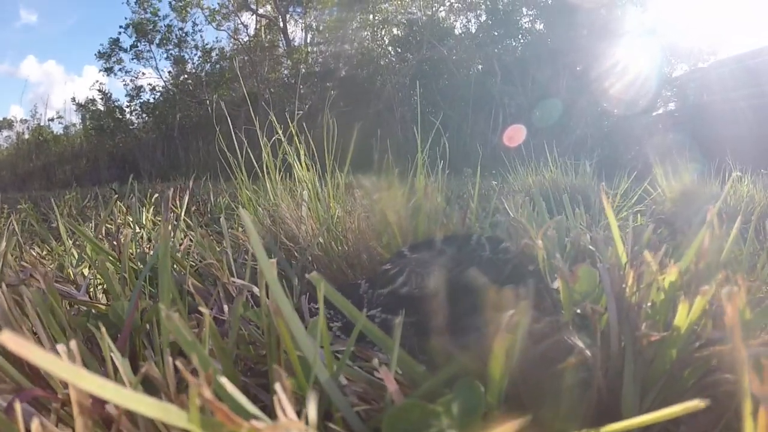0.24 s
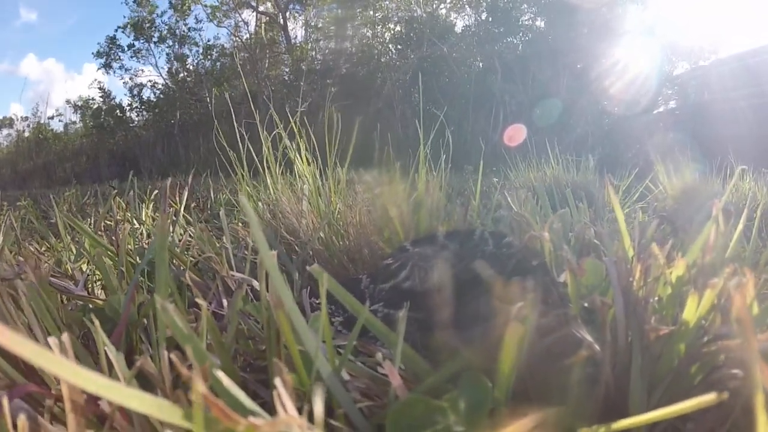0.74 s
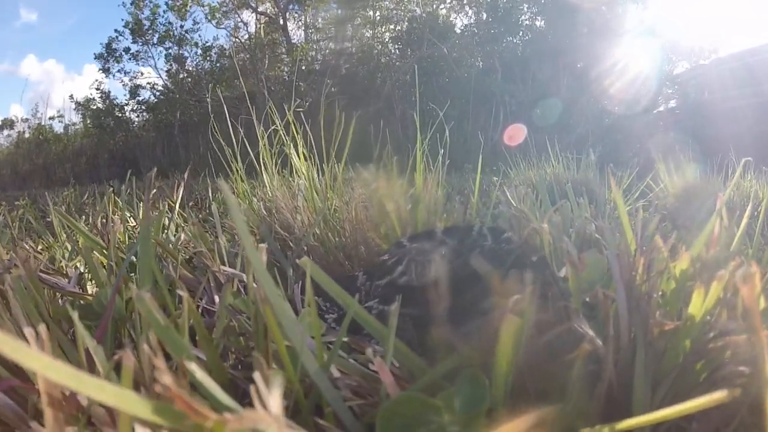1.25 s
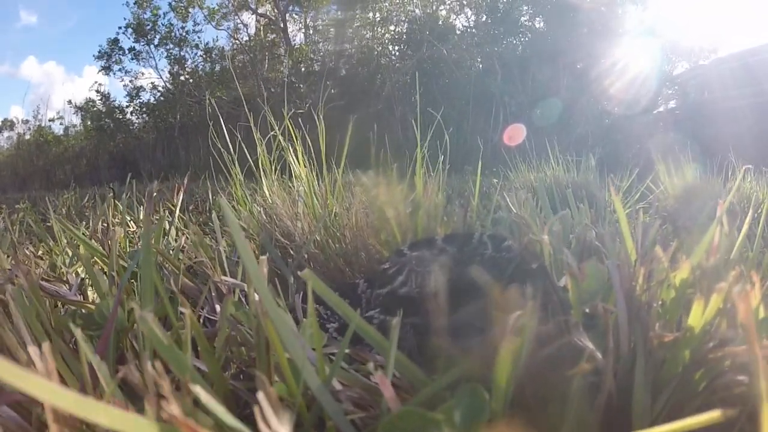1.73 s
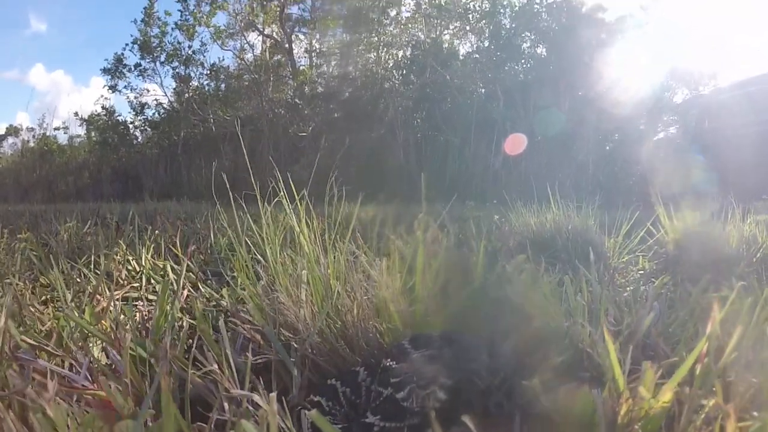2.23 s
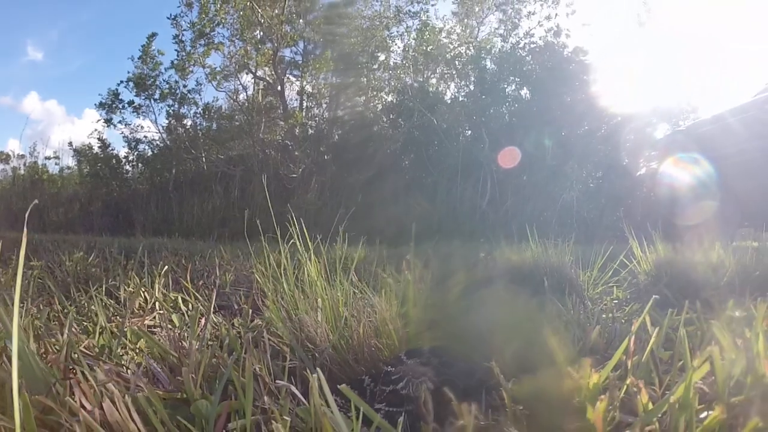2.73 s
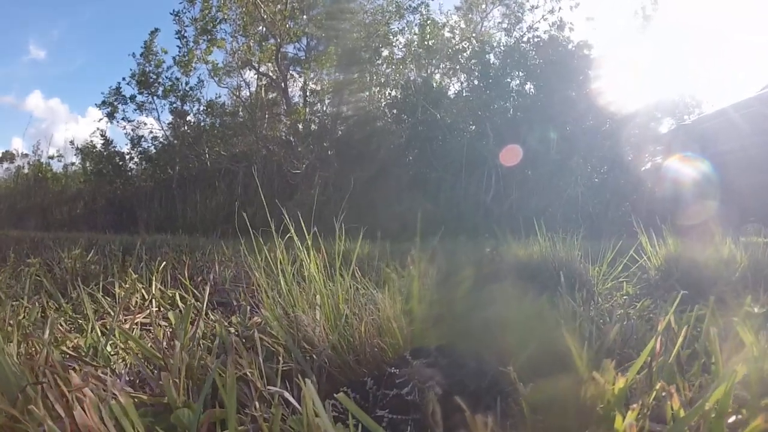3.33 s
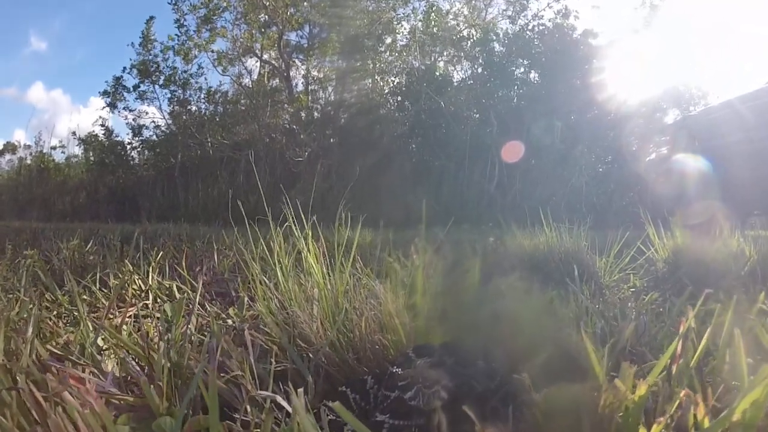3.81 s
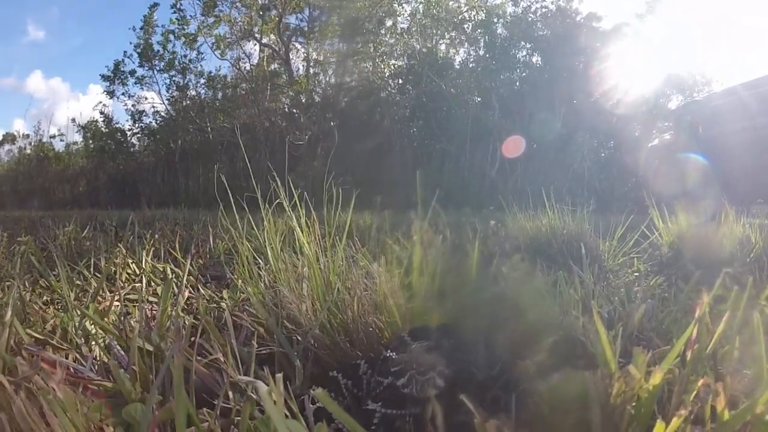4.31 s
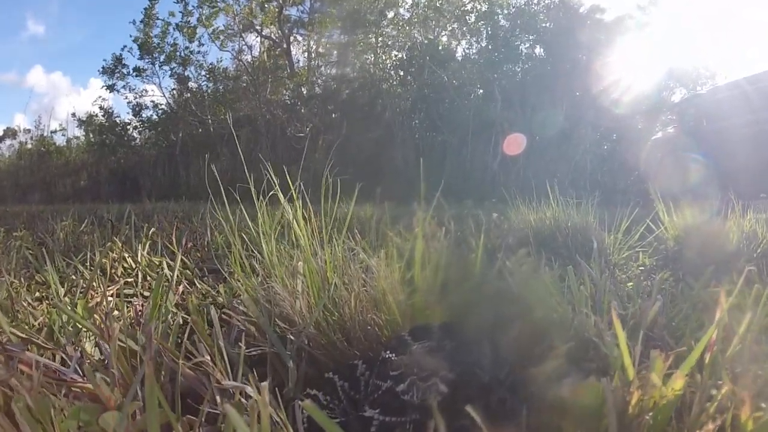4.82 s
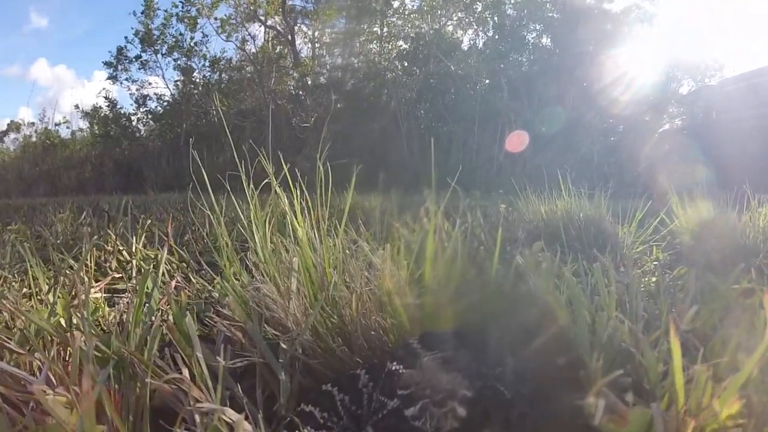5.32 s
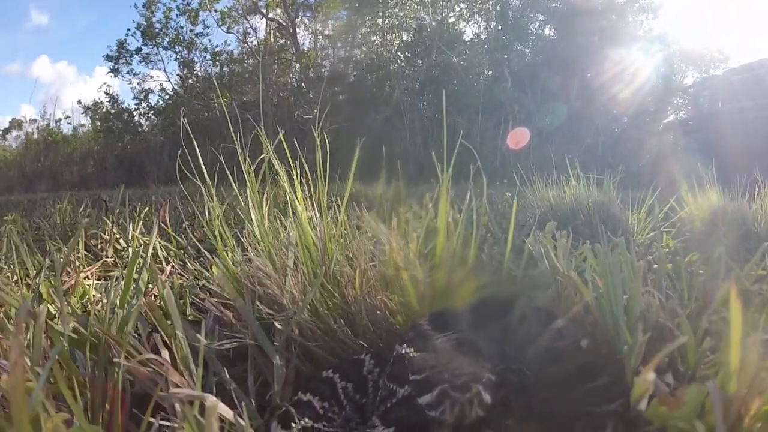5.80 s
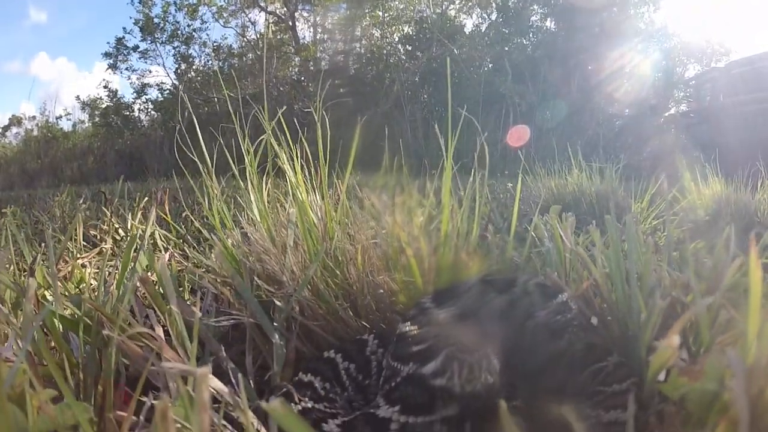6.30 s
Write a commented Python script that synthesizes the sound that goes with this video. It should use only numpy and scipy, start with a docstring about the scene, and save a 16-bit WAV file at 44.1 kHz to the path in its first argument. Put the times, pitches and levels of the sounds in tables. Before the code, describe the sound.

A rattlesnake buzzes without pause right beside a microphone inside a plastic housing in the grass. A bump and rubbing open it, blades scrape and flick against the shell, and a sharp cluster of flicks comes around two seconds. The middle is quieter, mostly rattle and low wind. Near six seconds a hard knock cracks and booms as the rattle surges, then rubbing and a smaller knock follow.

```python
"""A rattlesnake buzzes in the grass beside a plastic housing that holds the microphone.
From the start segments clash and ring at each tail stroke, grass rubs and ticks on the housing,
wind rumbles, and the housing booms softly as the grass presses. Knocks and bounces begin at once,
sliding swishes and flicks of bent blades from 0.2 s; the hardest knock falls near 5.9 s."""
import sys
import numpy as np
from scipy import signal
from scipy.fft import rfft, irfft
from scipy.io import wavfile
from scipy.ndimage import uniform_filter1d, map_coordinates

SR = 44100
rng = np.random.default_rng(int(sys.argv[2]) if len(sys.argv) > 2 else 0)


def file_out(sig):
    """Save sig as 16-bit WAV at sys.argv[1]."""
    # one column per channel
    cols = np.atleast_2d(sig).T
    # limit, then scale
    lim = np.clip(cols, -1, 1)
    pcm = np.round(lim * 32767).astype(np.int16)
    wavfile.write(sys.argv[1], SR, pcm)


N = 288855
TIME_S = np.arange(N) / SR

# tail shaking: (time [s], rate [strokes/s])
SHAKE = [(0, 170), (1.0, 164), (1.9, 143), (2.35, 172), (3.2, 155), (4.8, 138), (5.45, 166), (5.8, 160),
         (6.05, 220), (6.55, 173)]
# rattle loudness before a common gain: (time [s], relative level [dB])
RATTLE_LEVEL = [(0, -55), (.5, -52.5), (1.7, -55.5), (2.3, -54.5), (2.95, -59.5), (4.95, -56.5),
                (5.85, -51), (6.02, -48.5), (6.55, -52)]
# hollow keratin segments: (centre [Hz], width [Hz], relative density coiled, drawn back, raised [dB])
SEGMENT_MODES = [(3000, 1350, -8.5, -8.5, -25), (3607, 211, 15, 5, 8), (4280, 750, 0.5, -6.5, 2),
                 (5977, 153, 9, 3, 9.5), (6300, 710, -4, -9, -4), (7740, 210, 3, -7.5, -6),
                 (8870, 1500, -9, -10.5, -7), (9370, 190, 10, 0.5, 6), (9714, 400, -9, -2.5, 0.5),
                 (12140, 550, -25, -17, -7), (13140, 930, -6.5, -20, -19), (13800, 590, -15, -15, -2)]
# rattle posture: (time [s], posture [0 coiled close, 1 drawn back, 2 raised])
POSTURE = [(0, 0.16), (1.75, 0), (2.3, 0.79), (4.9, 0.75), (5.5, 1.7), (5.95, 0.62), (6.25, 1.95)]
TIGHT_PER_S, LOOSE_PER_S = 173.4, 167.4  # strokes/s: segments in step, thrown about

# steady lean of the grass on the housing: (time [s], pressure level [dB])
LEAN = [(0, -54.5), (1.5, -52), (2.15, -43), (2.65, -44.5), (2.92, -58), (3.65, -54.5), (4.0, -45),
        (4.7, -50), (5.15, -43), (5.45, -49.5), (6.55, -46.5)]
# movements pushing grass along the housing: (start [s], length [s], pressure level halfway [dB])
PUSHES = [(0, 0.082, -39), (0.093, 0.23, -41.5), (0.481, 0.14, -45.5), (.643, 0.016, -33.5),
          (0.728, .16, -39.5), (1.014, .1, -46.5), (1.126, .18, -41), (1.523, 0.039, -51.5),
          (1.732, 0.085, -41), (1.819, 0.22, -35), (2.59, 0.046, -36), (3.95, 0.039, -44),
          (4.02, 0.046, -47.5), (4.178, 0.11, -44.5), (4.383, 0.043, -41.5), (5.63, 0.15, -40.5),
          (5.763, 0.16, -35), (5.867, 0.15, -30), (6.094, 0.11, -38), (6.276, .045, -43.5),
          (6.408, 0.17, -43)]
PUSH_ATTACK_S, PUSH_RELEASE_S, PUSH_SWELL_DB = .0064, .015, 2.5
REFERENCE_DB = -39  # pressure of a moderate push
# treble of the rubbing: (time [s], gain above the edge frequency [dB])
RUB_EDGE = [(0, 2.5), (.8, -6), (1.4, 5), (1.8, -7), (2.03, 5.5), (2.2, -2), (2.7, -7.5), (3.5, 0.5),
            (4.0, 1), (4.8, -2.5), (5.7, 0.5), (6.1, -1.5), (6.55, 8)]
# resonances of the plastic housing: (centre [Hz], width [Hz], gain [dB])
HOUSING_MODES = [(275, 90, -8), (453, 22, -3), (716, 110, -2.5), (930, 182, 3), (1196, 260, -1),
                 (1397, 72, 7), (1744, 100, -0.5), (2236, 127, 1.5), (2629, 99, 5.5), (2700, 420, 0.5),
                 (3510, 45, -31), (4120, 220, -3.5), (5630, 150, -6), (6530, 124, -5), (10020, 360, -8.5)]

# wind rumble: (time [s], level [dB])
WIND_LEVEL = [(0, -33), (.3, -40.5), (1.7, -39.5), (2.38, -36.5), (2.75, -37.5), (3.3, -41.5), (4.15, -39),
              (5.25, -40), (5.85, -39), (6.2, -41), (6.36, -37)]
# rumble spectrum: (frequency [Hz], relative density [dB])
WIND_COLOUR = [(10, -33.5), (22, 2), (45, -5.5), (70, -17), (110, -25), (250, -28), (500, -31.5),
               (2000, -42), (15000, -76)]
# open-air hush ahead of its low-pass: (frequency [Hz], relative density [dB])
AIR_COLOUR = [(100, -38), (250, -9), (470, -5.5), (900, -15.5), (2000, -11), (5000, -2.5), (15000, 8)]
BOOM_DB, BOOM_COILED_DB = -40.5, 3  # at REFERENCE_DB; extra when fully coiled
BOOM_FOLLOWS = .44  # dB of boom per dB of pressure

TICKS_PER_S, TICK_RATE_FOLLOWS = 14, .7  # rate at REFERENCE_DB; dB of rate per dB of pressure
TICK_DB, TICK_SPREAD_DB, TICK_HZ = -1.5, .5, 2500  # level relative to pressure; centre pitch
FLICK_DECAY_S = .0018  # ticks and flicks
CRACK_DB = -15.5  # relative to the blade
CRACK_FROM_DB, CRACK_GROWS = -24, 1.93  # harder flicks gain this many extra dB per dB

# housing rocked on its mount: (time [s], swing level [dB], T60 [s])
BOUNCES = [(0.017, -24.5, 0.54), (.925, -29.5, .3), (1.417, -24, 0.2), (2.595, -23, 0.3),
           (2.808, -29, 0.33), (3.505, -30, 0.16), (5.024, -25.5, 0.15), (5.9066, -11.5, 0.14),
           (6.362, -31, 0.34), (6.51, -27.5, .25)]
BOUNCE_HZ, SHOVE_DB = 121.3, -.5  # shove relative to the swing, hardest jolt
# snake strikes: (time [s], housing [dB], contact decay [s], ring [Hz], ring [dB], crack [dB],
#                 thump [dB], thump [Hz])
KNOCKS = [(0.0175, -27, .0007, 2440, -32.5, -59, -43, 400),
          (1.410, -37.5, 0.0034, 2520, -48, -60, -41, 420),
          (2.5897, -29.5, 0.0092, 2920, -19.5, -56, -24.5, 490),
          (5.0441, -30, 0.0011, 2540, -50, -41, -35, 750),
          (5.9015, -14.5, 0.007, 5800, -20, -18.5, -19, 686),
          (6.3636, -18, 0.0018, 1340, -25.5, -41, -49, 600)]
THUMP_AFTER_S, THUMP_DECAY_S, THUMP_WIDTH_HZ = .0063, .00086, 500
# blades sliding off the housing: (start [s], length [s], level [dB], first [Hz], last [Hz])
SWISHES = [(0.195, 0.03, -44, 6500, 4480), (0.643, 0.034, -39.5, 6200, 5700),
           (0.658, 0.015, -30, 3250, 1914), (1.501, 0.031, -33, 6800, 5790),
           (1.505, 0.024, -32.5, 3100, 2330), (1.518, 0.04, -37, 2490, 1466),
           (1.933, 0.12, -39, 2900, 2090), (2.043, 0.021, -39, 5600, 2510), (3.70, 0.44, -49, 2390, 2390),
           (5.751, 0.032, -33.5, 2937, 2380), (5.883, 0.037, -26.5, 6670, 5450)]
# blades flicking the housing: (time [s], blade level [dB], blade pitch [Hz], housing re blade [dB])
FLICKS = [(0.209, -27.5, 2570, -7), (0.2726, -43, 2400, 9.5), (.4863, -45.5, 2740, 9),
          (0.5723, -39, 2530, -8), (0.908, -37.5, 1630, 0), (0.9313, -19, 6240, -8.5),
          (1.1427, -38, 1020, -10), (1.2818, -36, 2820, -1), (1.318, -35.5, 2530, 1),
          (1.8216, -30, 955, -1.5), (1.8288, -30, 2230, -17), (1.895, -29.5, 910, -17),
          (1.9285, -25, 960, -4), (1.9582, -15.5, 2870, -8), (1.976, -21.5, 2210, -15),
          (2.0222, -42, 2880, 0), (2.0694, -33.5, 1290, 4), (2.5886, -26, 4000, -4),
          (2.6754, -39.5, 4400, 0), (2.683, -41, 2720, 2), (3.2692, -42, 2800, -1), (3.969, -44.5, 2420, 7),
          (5.3568, -46, 2560, 9.5), (5.5451, -46.5, 2720, 6), (5.5906, -44.5, 6400, 3.5),
          (5.6378, -40.5, 2400, 4), (5.789, -30.5, 2730, -9), (5.8755, -27, 1540, -1.5),
          (5.999, -30.5, 2580, 4.5), (6.1269, -27, 2540, -4.5), (6.171, -31, 2570, -4),
          (6.4055, -31, 1380, -2), (6.4679, -32.5, 2570, -22), (6.505, -35, 2600, 1.5)]


def from_db(db):
    """Decibels to gain."""
    return 10 ** (np.asarray(db) / 20)


def rms_one(x):
    """Scale to unit rms."""
    return x / np.sqrt(np.mean(x ** 2) + 1e-20)


def curve(rows):
    """Second column of a (time, value) table, interpolated to every sample."""
    time_s, value = np.transpose(rows)
    return np.interp(TIME_S, time_s, value)


def add(track, start_s, sound):
    """Mix a short sound in at a given time."""
    at = max(0, round(start_s * SR))
    track[at:at + len(sound)] += sound[:N - at]


def cut(x, hz, kind, order=2):
    """Butterworth low- or high-pass."""
    return signal.sosfilt(signal.butter(order, hz, kind, fs=SR, output="sos"), x)


def band(x, hz, width_hz):
    """Pair of coupled resonances: flat top, steep sides."""
    edges_hz = [hz - width_hz / 2, hz + width_hz / 2]
    return signal.sosfilt(signal.butter(2, edges_hz, "band", fs=SR, output="sos"), x)


def resonate(x, hz, width_hz):
    """One resonance with gain 1 at its top."""
    r = np.exp(-np.pi * width_hz / SR)
    zeros = np.array([1, 0, -1]) * (1 - r * r) / 2
    poles = [1, -2 * r * np.cos(2 * np.pi * hz / SR), r * r]
    return signal.lfilter(zeros, poles, x + 1e-18)


def drift(rate_hz):
    """Slow random wander, rms 1; the filter's first second is dropped."""
    return rms_one(cut(rng.standard_normal(N + SR), rate_hz, "low")[SR:])


def coloured(spectrum):
    """Noise with a given spectrum, rms 1."""
    hz, db = np.transpose(spectrum)
    bins_hz = np.maximum(np.fft.rfftfreq(N, 1 / SR), 1)
    gain = from_db(np.interp(np.log(bins_hz), np.log(hz), db))
    return rms_one(irfft(rfft(rng.standard_normal(N)) * gain, N))


def evened(x, span_s):
    """Hold the running rms at 1, leaving faster detail alone."""
    power = uniform_filter1d(x * x, max(2, int(span_s * SR)))
    return x / np.sqrt(np.maximum(power, 1e-20))


def strokes(limp_db=3.5, rebound_db=-8, rebound_s=.0042):
    """Segments clash at each tail turn; loose shaking rebounds harder, in a four-stroke limp."""
    jitter_s, limp_s, scatter_db = .0005, .0006, 2.8  # scaled by the slack
    clatter_s, chatter, tightest = .00056, .05, .22
    per_s = curve(SHAKE)
    turns = np.flatnonzero(np.diff(np.floor(np.cumsum(per_s) / SR)))
    chance = rng.standard_normal((len(turns), 4))
    looseness = (TIGHT_PER_S - per_s[turns]) / (TIGHT_PER_S - LOOSE_PER_S)
    slack = tightest + np.clip(looseness, 0, 1)
    limp = np.arange(len(turns)) * np.pi / 2  # strong, late, weak, early
    clash_s = turns / SR + slack * (limp_s * np.sin(limp) + jitter_s * chance[:, 0])
    force = from_db(slack * (limp_db * np.cos(limp) + scatter_db * chance[:, 1]))
    return_s = clash_s + rebound_s + jitter_s * chance[:, 2]
    rebound = force * from_db(rebound_db + scatter_db * chance[:, 3]) * np.sqrt(slack)

    def sample(s):
        """Nearest earlier sample inside the scene."""
        return np.clip((s * SR).astype(int), 0, N - 1)

    clashes = np.zeros(N)
    clashes[sample(clash_s)] = force
    clashes[sample(return_s)] += rebound
    # a clash swells and dies down the chain, which never comes fully to rest
    age = np.arange(SR // 100) / SR / clatter_s
    return signal.oaconvolve(clashes, age * np.exp(1 - age))[:N] + chatter


def sway(x, share=.009, rate_hz=2):
    """The swaying tail bends the rattle's pitch; share is the rms speed change."""
    position = np.arange(N) + np.cumsum(share * drift(rate_hz))
    return map_coordinates(x, [position], order=3, mode="reflect")


def rattle(gain_db=8.0, waver_db=1.35, click_db=-18):
    """Strokes ring the hollow segments, coloured by posture, over a faint dry click."""
    force, posture = strokes(), curve(POSTURE)
    buzz = from_db(click_db) * band(force * rng.standard_normal(N), 9700, 9800)
    for hz, width_hz, *posture_db in SEGMENT_MODES:
        # a segment rings about equally hard on every stroke
        ring = evened(band(rng.standard_normal(N), hz, width_hz), .0038)
        ring = ring * np.sqrt(2 * width_hz / SR)
        mode_db = np.interp(posture, np.arange(3), posture_db)
        buzz = buzz + band(ring * force, hz, 2 * width_hz) * from_db(mode_db)
    level_db = curve(RATTLE_LEVEL) + gain_db + waver_db * drift(4.9)
    return from_db(level_db) * evened(sway(buzz), .12)


def pressure():
    """How hard the grass works on the housing [dB]: steady lean plus pushes, summed as power."""
    power = from_db(curve(LEAN)) ** 2
    for start_s, length_s, db in PUSHES:
        age_s = TIME_S - start_s
        attack = np.clip(age_s / PUSH_ATTACK_S, 0, 1)
        release = np.exp(-np.maximum(age_s - length_s, 0) / PUSH_RELEASE_S)
        swell_db = PUSH_SWELL_DB * (np.clip(age_s / length_s, 0, 1) - .5)
        power = power + (attack * release * from_db(db + swell_db)) ** 2
    return 10 * np.log10(power)


def housing(force):
    """Rough contact under a force envelope; each plastic mode gets its own noise."""
    return sum(from_db(db) * resonate(force * rng.standard_normal(len(force)), hz, width_hz)
               for hz, width_hz, db in HOUSING_MODES)


def rubbing(press_db, gain_db=-1.0, grains_per_s=330, edge_hz=1900):
    """Blades stick and slip on the housing in random tiny snaps over a smooth slide."""
    size_db, grain_s, smooth = 2.6, .0005, .3
    born = rng.random(N) < grains_per_s / SR
    slips = born * from_db(size_db * np.minimum(rng.exponential(1, N), 3))
    force = signal.lfilter([1], [1, -np.exp(-1 / (grain_s * SR))], slips) + smooth
    rub = evened(cut(housing(force), 9000, "low", order=4), .04)
    dull = cut(rub, edge_hz, "low", order=1)
    bright = from_db(curve(RUB_EDGE)) * (rub - dull)
    return from_db(press_db + gain_db) * (dull + bright)


def wind():
    """Gusts rumble on the housing: low-heavy noise under a level curve."""
    return from_db(curve(WIND_LEVEL)) * evened(coloured(WIND_COLOUR), .14)


def boom(press_db, hz=119, width_hz=33):
    """Pressing grass stirs the housing's low resonance, more so while the snake is coiled."""
    coiled = np.clip(1 - curve(POSTURE), 0, 1)
    level_db = BOOM_DB + BOOM_COILED_DB * coiled + BOOM_FOLLOWS * (press_db - REFERENCE_DB)
    return from_db(level_db) * evened(band(rng.standard_normal(N), hz, width_hz), .087)


def air(gain_db=-56):
    """Steady hush of the open field: coloured noise, low-passed."""
    return from_db(gain_db) * cut(coloured(AIR_COLOUR), 7000, "low")


def punch(x):
    """Set a short sound's level, taken over 5 ms, to 1."""
    return x / np.sqrt(np.sum(x * x) / (SR / 200))


def contact(decay_s):
    """Force of a blow: blade or snout yields at first, then the force dies away."""
    t_s, give_s = np.arange(SR // 10) / SR, .0008
    return (1 - np.exp(-t_s / give_s)) * np.exp(-t_s / decay_s)


def blow(body_db, decay_s, hz, ring_db, crack_db, ring_q=10.5, crack_hz=4000,
         tail_db=-29, tail_s=.023):
    """A blow cracks, rings the housing and adds the pitch of the spot or blade that is hit."""
    crack_s = .002
    force = contact(decay_s)
    grit = rng.standard_normal((2, len(force)))
    body = punch(housing(force + from_db(tail_db) * contact(tail_s)))
    ring = punch(resonate(resonate(force * grit[0], hz, hz / ring_q), hz, hz / 2))
    crack = punch(cut(contact(crack_s) * grit[1], crack_hz, "high"))
    mix = from_db(body_db) * body + from_db(ring_db) * ring + from_db(crack_db) * crack
    return cut(mix, 6900, "low")


def ticks(press_db, housing_db=-2, spread_octaves=.25):
    """Lesser blades tick at random, louder and more often as the grass is pressed."""
    out = np.zeros(N)
    per_s = TICKS_PER_S * from_db(TICK_RATE_FOLLOWS * (press_db - REFERENCE_DB))
    for at in np.flatnonzero(rng.random(N) < per_s / SR):
        size, pitch = np.clip(rng.standard_normal(2), -2, 2)
        db = press_db[at] + TICK_DB + TICK_SPREAD_DB * size
        hz = TICK_HZ * 2 ** (spread_octaves * pitch)
        add(out, at / SR, blow(db + housing_db, FLICK_DECAY_S, hz, db, db + CRACK_DB))
    return out


def bounces():
    """A jolt shoves the wall in, a dull pulse, and the housing bounces on its mount."""
    out, t_s = np.zeros(N), np.arange(SR // 3) / SR
    shove = np.exp(-((t_s - 1 / (4 * BOUNCE_HZ)) / .0004) ** 2)
    hardest_db = max(db for _, db, _ in BOUNCES)
    for start_s, db, t60_s in BOUNCES:
        swing = np.exp(-np.log(1000) * t_s / t60_s) * np.sin(2 * np.pi * BOUNCE_HZ * t_s)
        # a gentle jolt hardly dents the wall
        dent = from_db(SHOVE_DB + db - hardest_db) * shove
        add(out, start_s, from_db(db) * (swing + dent))
    return out


def knocks(body_db=-4):
    """The snout hits first; a dull thump follows as the body's weight lands."""
    out = np.zeros(N)
    for start_s, housing_db, decay_s, hz, ring_db, crack_db, thump_db, thump_hz in KNOCKS:
        add(out, start_s, blow(housing_db, decay_s, hz, ring_db, crack_db))
        force = contact(THUMP_DECAY_S)
        thump = resonate(resonate(force, thump_hz, THUMP_WIDTH_HZ), thump_hz, THUMP_WIDTH_HZ)
        body = from_db(body_db) * punch(housing(force))
        add(out, start_s + THUMP_AFTER_S, from_db(thump_db) * (punch(thump) + body))
    return out


def swishes(width_hz=420, body_db=-6):
    """A sliding blade swells and fades; its pitch mostly falls, or holds steady in a long scrape."""
    out = np.zeros(N)
    for start_s, length_s, db, first_hz, last_hz in SWISHES:
        n = int(length_s * SR)
        phase = 2 * np.pi * np.cumsum(np.geomspace(first_hz, last_hz, n)) / SR
        blade = rms_one(cut(rng.standard_normal(n), width_hz, "low") * np.sin(phase))
        body = from_db(body_db) * rms_one(housing(np.ones(n)))
        add(out, start_s, from_db(db) * np.hanning(n) * (blade + body))
    return out


def flicks():
    """A bent blade lets go and hits the housing; the hardest ones crack."""
    out = np.zeros(N)
    for start_s, db, hz, housing_db in FLICKS:
        crack_db = db + CRACK_DB + CRACK_GROWS * max(db - CRACK_FROM_DB, 0)
        add(out, start_s, blow(db + housing_db, FLICK_DECAY_S, hz, db, crack_db))
    return out


def scene():
    """Everything reaches one microphone inside the housing."""
    press_db = pressure()
    steady = rattle() + rubbing(press_db) + wind() + boom(press_db) + air()
    hits = ticks(press_db) + bounces() + knocks() + swishes() + flicks()
    return (steady + hits)[None]


def record(dry):
    """Clip at full scale, then cut the top with a steep low-pass."""
    low_pass = signal.ellip(10, .1, 80, 15200, fs=SR, output="sos")
    return signal.sosfilt(low_pass, np.clip(dry, -1, 1))


dry = scene()
out = record(dry)
file_out(out)
```